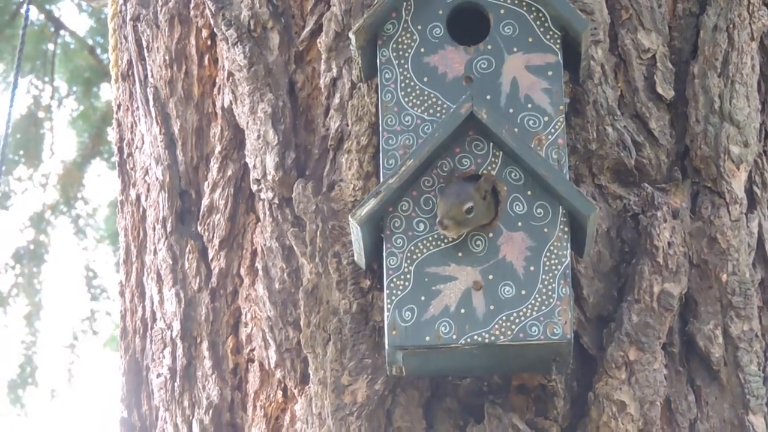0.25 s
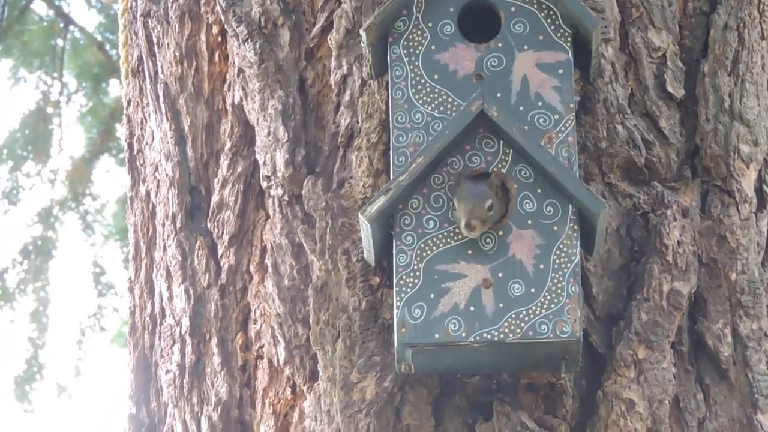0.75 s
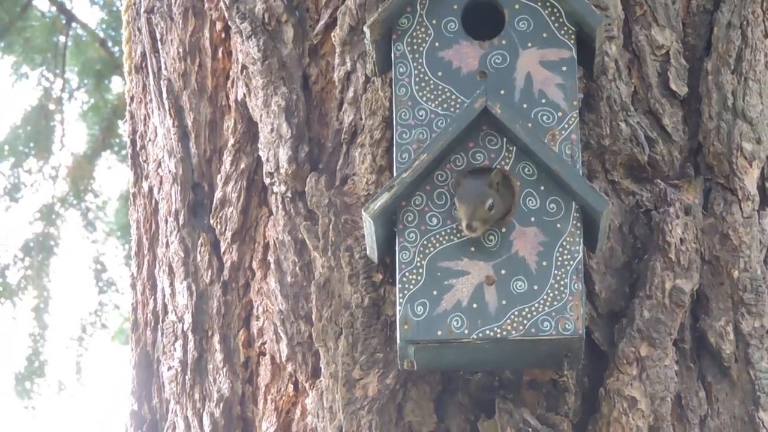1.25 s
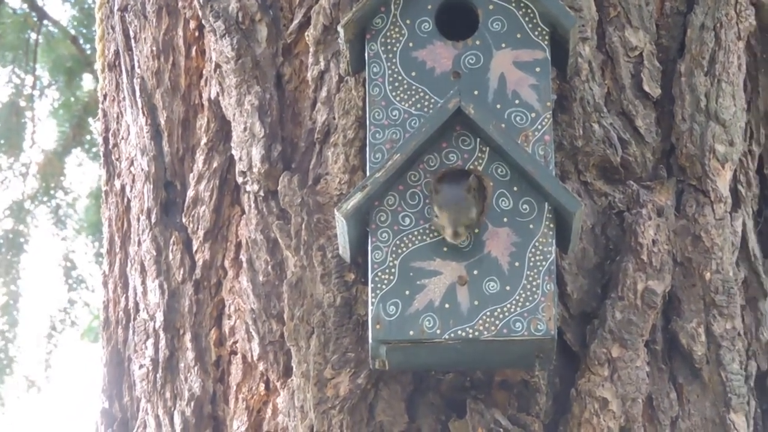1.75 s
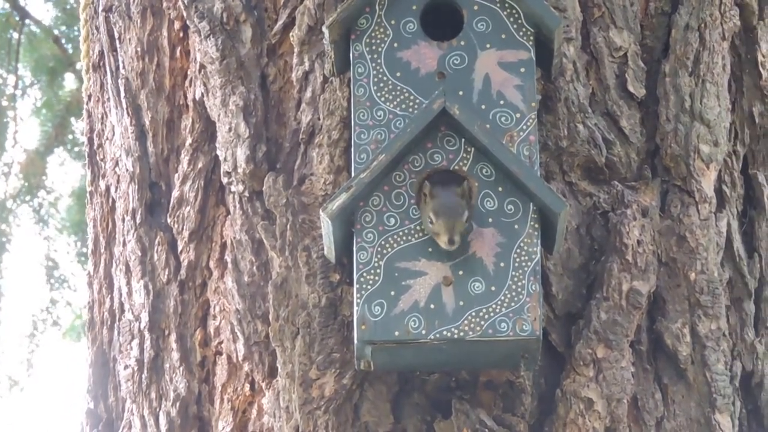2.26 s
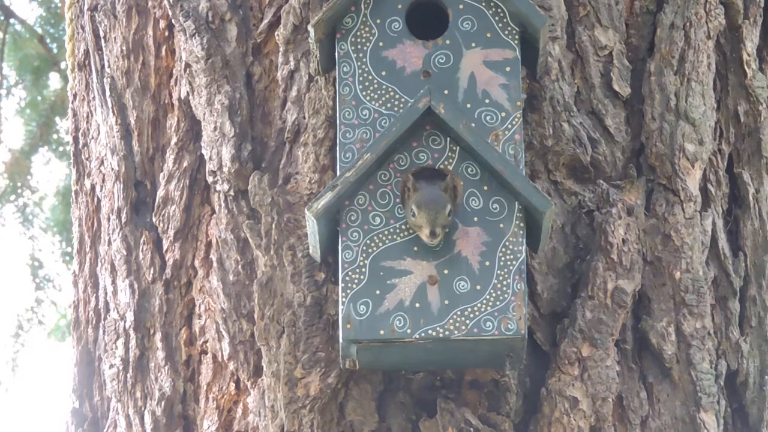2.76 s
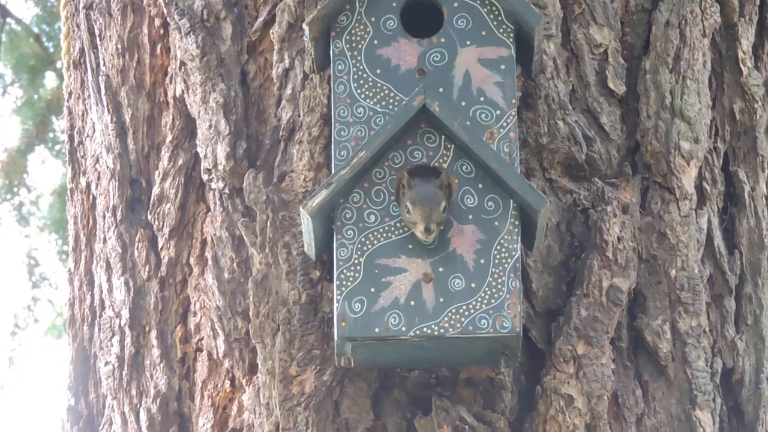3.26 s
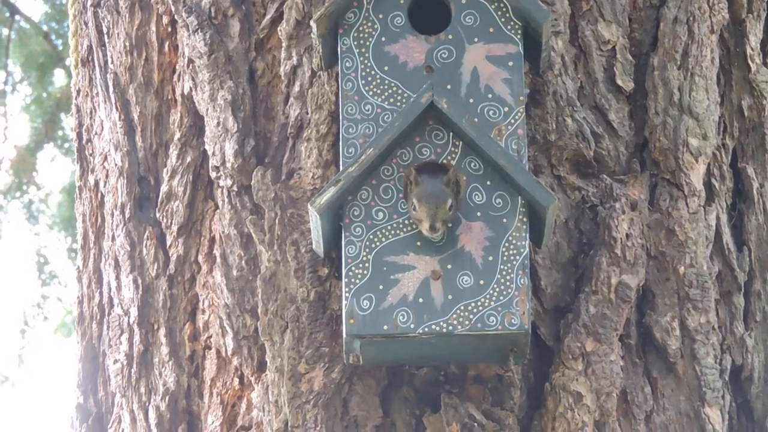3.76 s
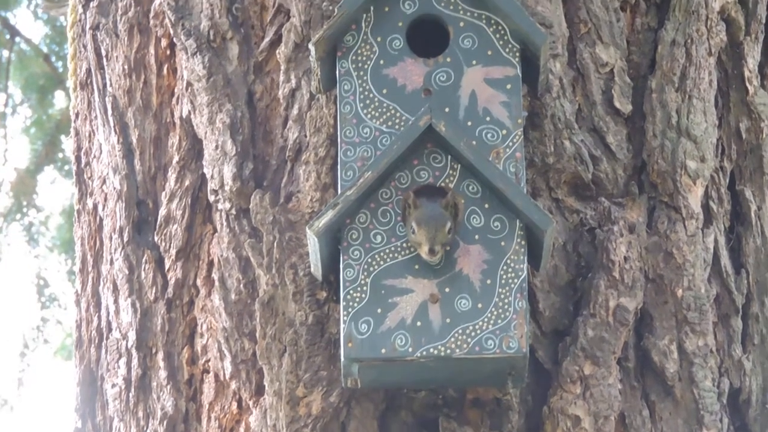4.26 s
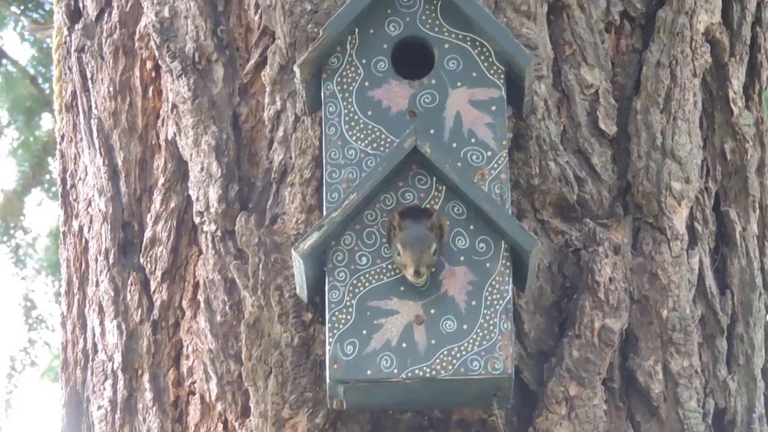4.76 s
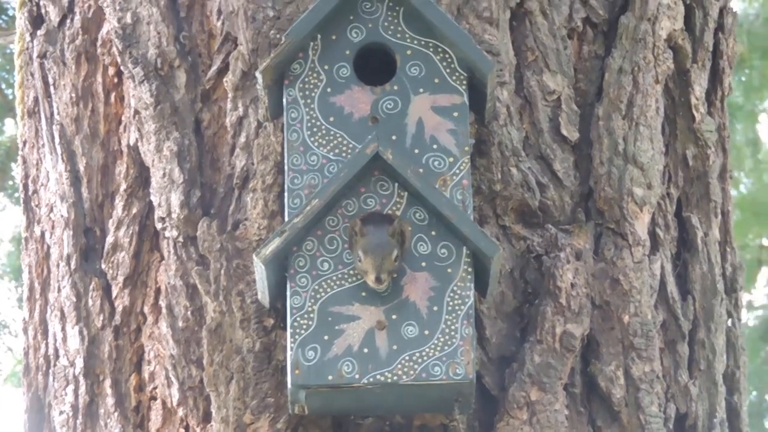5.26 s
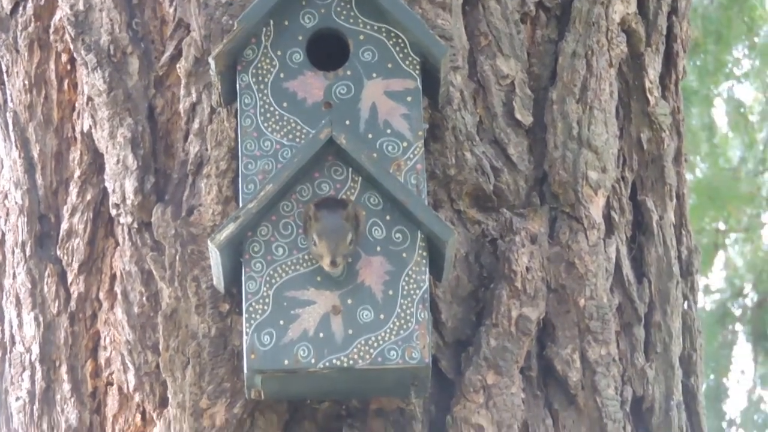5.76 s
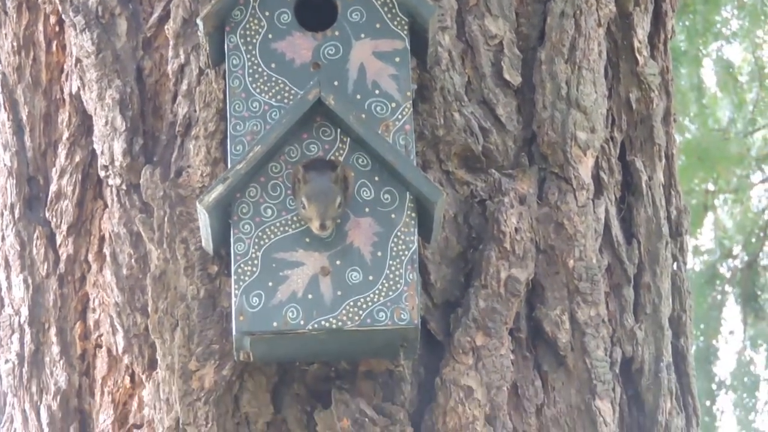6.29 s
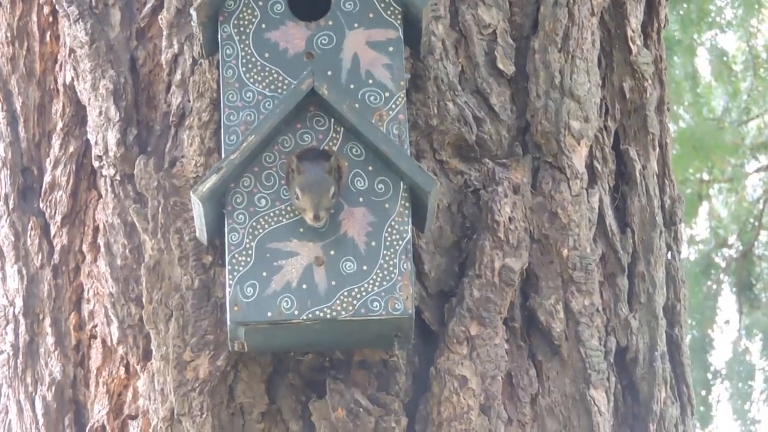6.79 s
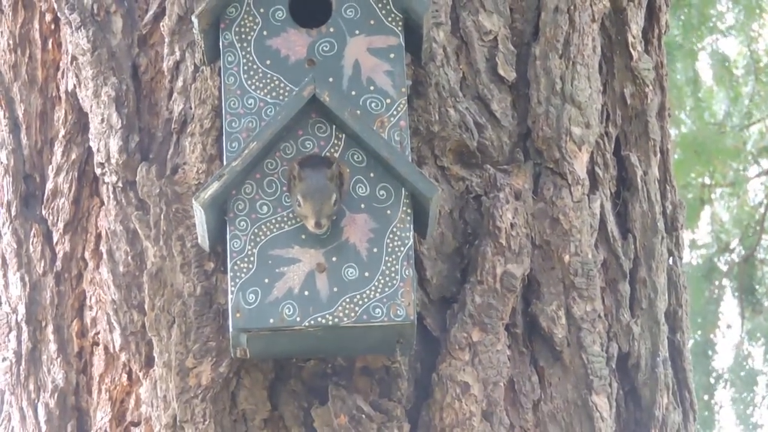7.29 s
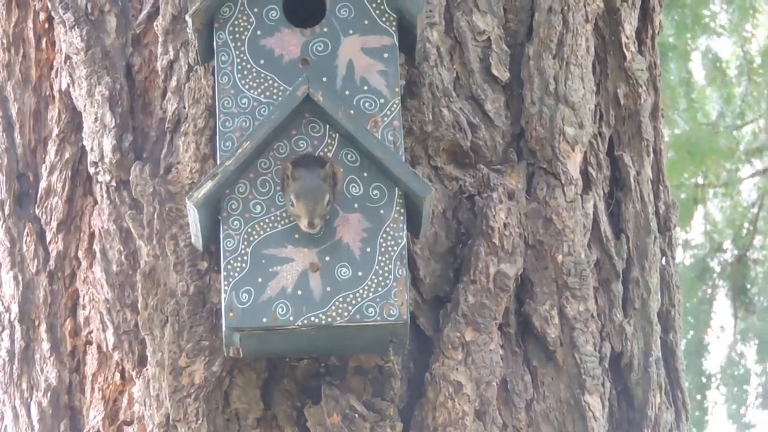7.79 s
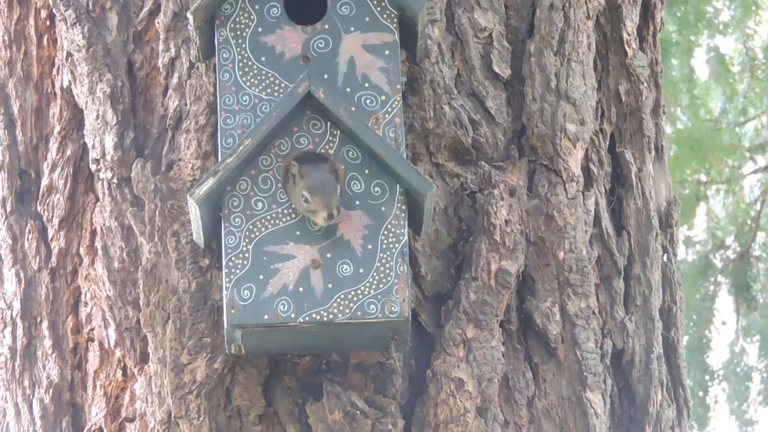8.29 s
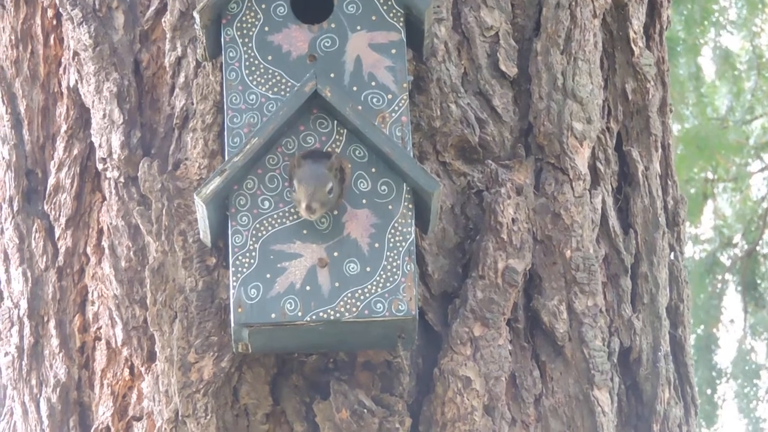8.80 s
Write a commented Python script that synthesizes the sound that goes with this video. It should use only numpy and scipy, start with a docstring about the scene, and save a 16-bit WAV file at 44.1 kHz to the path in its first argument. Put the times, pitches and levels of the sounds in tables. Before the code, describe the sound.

Outdoors among trees, a squirrel scolds in very short, bright, rough pulsed barks, many starting with a thin whistled squeak and a puff of rasping air. Isolated calls lead to an even series of plain chucks, a pause, one strong squeaky call, then spaced, gradually softer ones. Each gets a quick slap echo and brief diffuse tail. Tiny scratches and barely audible peeps lie between, over soft low hum; the stereo microphone hears it a little right.

```python
"""Squirrel scolding from a nest box

A squirrel in the hole of a wooden nest box scolds: rough pulsed chucks, many led in by a thin whistled squeak.
Bursts of rasping air break into the squeaks; faint breathy peeps, a far bird's thin notes and scratchy claw
ticks fill the gaps. Delayed copies and sparse tails of random taps make the trunks and leaves throw every call
back. Far traffic hums below as shaped noise. A stereo camera hears the animal a little to the right."""
import sys
import numpy as np
from scipy import signal
from scipy.fft import rfft, irfft, next_fast_len
from scipy.io import wavfile
from scipy.ndimage import uniform_filter1d

SR = 44100
rng = np.random.default_rng(int(sys.argv[2]) if len(sys.argv) > 2 else 0)


def attenuation_scalar(level_db):
    """Turn a level in dB into a linear amplitude multiplier (20 dB per decade)."""
    decades = np.asarray(level_db, float) / 20
    return 10 ** decades


def wrap_up_sound(samples):
    """Save the sound to the file named by the first command line argument, as 16-bit audio."""
    columns = np.atleast_2d(samples).T
    # keep every value between -1 and 1, then stretch to whole-number steps
    tamed = np.clip(columns, -1, 1)
    steps = np.round(tamed * 32767).astype(np.int16)
    wavfile.write(sys.argv[1], SR, steps)


N = 398663  # length in samples

# The squeaks, one short curve each. Each row: time in seconds, pitch in Hz, level in dB.
SQUEAKS = [
    [(1.103, 4800, -66), (1.115, 6460, -57), (1.122, 6240, -31), (1.13, 6120, -29.5), (1.135, 5500, -47)],
    [(1.187, 5420, -34), (1.192, 6020, -35), (1.199, 5960, -39), (1.203, 5300, -51)],
    [(1.614, 5300, -48), (1.623, 6270, -47), (1.63, 6340, -29.5), (1.64, 6140, -36), (1.645, 6000, -60)],
    [(2.515, 5050, -57), (2.525, 6220, -44), (2.533, 7630, -53), (2.54, 7520, -46), (2.545, 6180, -28),
     (2.55, 6100, -41)],
    [(2.925, 4750, -41), (2.93, 5580, -36), (2.935, 5630, -30), (2.939, 5500, -38), (2.945, 5000, -44)],
    [(4.946, 5240, -63), (4.952, 5800, -39), (4.96, 6120, -26), (4.967, 6270, -23), (4.976, 6150, -32)],
    [(5.697, 5180, -64), (5.71, 6190, -54), (5.724, 6240, -56), (5.729, 6810, -40), (5.733, 6170, -30.5),
     (5.737, 5930, -59)],
    [(6.282, 5430, -67), (6.292, 6480, -37), (6.3, 6400, -57), (6.308, 6870, -49), (6.314, 6850, -48),
     (6.318, 6460, -57)],
    [(6.63, 6060, -55), (6.645, 6100, -51), (6.651, 8080, -55), (6.655, 6300, -33), (6.66, 6220, -59)],
    [(6.995, 6230, -45), (7.003, 6750, -77), (7.028, 6900, -41.5), (7.035, 6080, -31.5), (7.041, 6100, -69)],
    [(7.334, 5590, -64), (7.34, 6350, -60.5), (7.35, 7300, -63), (7.356, 7220, -53), (7.364, 6380, -42),
     (7.368, 5800, -53)],
    [(7.653, 5570, -62), (7.66, 6120, -59), (7.682, 6140, -44.5), (7.695, 6350, -49), (7.703, 6280, -66)],
    [(7.915, 5210, -68), (7.925, 6450, -54), (7.946, 7900, -61), (7.952, 7200, -45), (7.956, 6130, -30.5),
     (7.961, 6000, -62)],
    [(8.623, 4800, -50), (8.627, 5410, -42.5), (8.636, 5280, -50), (8.643, 5050, -38.5), (8.647, 5190, -54)],
]
# How the two ports of the camera hear the animal.
# Each row: frequency in Hz, left minus right in dB, phase lag of the left in radians.
SIDE = [(1100, 1, 0.097), (3000, -6.5, 1.2), (5000, -3, 0.88), (8500, -10.5, 1.57), (12000, -8, 1),
        (15000, -0.5, 1.9)]


def evened(x):
    """Scales to rms 1."""
    return x / np.sqrt(np.mean(x ** 2) + 1e-20)


def read(points, hz, column=1):
    """Reads a table on a log-frequency axis."""
    table = np.transpose(points)
    return np.interp(np.log(hz + 1), np.log(table[0] + 1), table[column])


def add(mix, s, sound):
    """Adds a sound to the mix at s seconds."""
    part = mix[round(s * SR):][:len(sound)]
    part += sound[:len(part)]


def resonate(x, hz, width):
    """Shifts the curve hz to zero, smooths twice and shifts back: a steep resonance of gain 1."""
    turn = np.exp(2j * np.pi * np.cumsum(hz * np.ones(len(x))) / SR)
    r = np.exp(-np.pi * width / SR)
    smooth = signal.lfilter([(1 - r) ** 2], [1, -2 * r, r * r], x / turn)
    return 2 * (turn * smooth).real


def tract(x, modes, mouth=1):
    """Throat and mouth: parallel resonances of alternating sign, all shifted by the mouth, rms 1."""
    total = 0
    for k, (hz, width, db) in enumerate(modes):
        total = total + (-1) ** k * attenuation_scalar(db) * resonate(x, hz * mouth, width)
    return evened(total)


def chuck(s, db, top_hz, length, low_db):
    """Vocal fold pulses speed up as the mouth opens, then sag and turn ragged as the breath runs out."""
    # Throat resonances of the low band. Each row: multiple of the throat pitch, width in Hz, level in dB.
    low_throat = [(.66, 504, -17), (1., 880, 20), (1.5, 1310, -3)]
    # Resonances of the bright band, reached as the mouth opens. Each row: centre in Hz, width in Hz, level in dB.
    bright_throat = [(6900, 2510, -13.5), (10120, 2000, -10.5), (11000, 1000, -2.5), (12620, 1260, 5),
                     (14640, 4900, -13)]
    u = np.arange(round(1.6 * length * SR)) / SR / length  # time in units of length
    wobble, puff = rng.standard_normal((2, len(u)))
    ragged = np.clip(0.18 + 0.4 * u ** 2, 0, 0.8)

    rise = 0.46 * np.clip(1 - u / 1.05, 0, 1) ** 1.8
    sag = 0.35 * np.clip(u - 1.05, 0, 1)
    hz = top_hz * (1 - rise - sag)
    turns = np.cumsum(hz * (1 + 0.5 * ragged * uniform_filter1d(wobble, size=40))) / SR
    folds = evened(sum(np.cos(2 * np.pi * k * turns) * (k * hz < 0.45 * SR) for k in range(1, 28)))
    alternation = 1 + ragged * np.cos(np.pi * turns)  # strong and weak pulses alternate
    folds *= alternation
    puffs = evened(np.exp(-(turns % 1) / 0.3) * puff)  # air noise gated by each opening

    pursed = any(0 < s - rows[-1][0] < 0.02 for rows in SQUEAKS)  # a squeak leaves the mouth narrow
    mouth = 1 - (0.17 if pursed else 0.07) * np.clip(1 - u / 0.89, 0, 1)
    effort = (u + 0.14) * np.exp(-(u / 1.065) ** 3.13)
    effort *= np.clip(u / 0.075, 0.3, 1)  # the first pulses are weak
    late = np.clip((u / 0.44) ** 3, 0.25, 1) if pursed else 1  # the narrow mouth holds the bright band back

    bright = evened(late * effort ** 1.5) * tract((1 - ragged) * folds + ragged * puffs, bright_throat, mouth)
    throat_hz = 3223 + 40 * (low_db + 41)  # a harder chuck stretches the throat to a higher ring
    low_source = folds + 2.2 * (ragged + 0.15) * puffs
    low = evened(effort) * tract(low_source, low_throat, throat_hz * np.sqrt(mouth))
    fundamental = evened(effort ** 0.23 * alternation * np.sin(2 * np.pi * turns))
    fundamental_db = -52.5 + 0.33 * (db + 27)  # grows little with effort
    return s, attenuation_scalar(db) * bright + attenuation_scalar(low_db) * low + attenuation_scalar(fundamental_db) * fundamental


def squeak(rows):
    """A near-sine whistle with its octave and a weak partial at 1.5 times its pitch."""
    s, *columns = np.transpose(rows)
    t = np.arange(s[0], s[-1], 1 / SR)
    hz, db = (np.interp(t, s, c) for c in columns)
    wobble = uniform_filter1d(rng.standard_normal(len(t)), size=40)
    angle = 2 * np.pi * np.cumsum(uniform_filter1d(hz, size=60) * (1 + 0.033 * wobble)) / SR
    octave = attenuation_scalar(-47 + 0.55 * (db + 34))  # grows more slowly than the tone
    octave = octave / (1 + (hz / 6650) ** 30)  # above this pitch it falls out of the bright throat
    octave = octave * (1 + 1.3 * np.exp(-((hz - 5590) / 300) ** 2))  # here it meets a throat resonance
    tone = attenuation_scalar(db) * (np.sin(angle) + attenuation_scalar(-32) * np.sin(1.5 * angle))
    tone = tone + octave * np.sin(2 * angle)
    return s[0], np.sqrt(2) * tone * signal.windows.tukey(len(t), 0.1)


def rasp(s, length, db):
    """Air noise swells in the throat, peaks late and stops."""
    # Throat resonances of the rasping air. Each row: centre in Hz, width in Hz, level in dB.
    airy_throat = [(7000, 3500, -0.91), (9860, 1300, -1.6), (12400, 1500, 0)]
    u = np.arange(round(length * SR)) / SR / length
    air = rng.standard_normal(len(u))
    swell = np.sin(np.pi * u ** 1.64) ** 0.63
    return s, attenuation_scalar(db) * swell * tract(air, airy_throat)


def peep(s, length, hz, width, db):
    """Air noise in a narrow resonance and its octave."""
    air = rng.standard_normal(round(length * SR))
    octave_db = -33 + 260 * length  # drawn-out peeps carry a stronger octave
    sound = evened(resonate(air, hz, width))
    sound = sound + attenuation_scalar(octave_db) * evened(resonate(air, 2 * hz, 2 * width))
    return s, attenuation_scalar(db) * sound * signal.windows.tukey(len(air), 0.4)


def tick(s, db, hz):
    """A short claw scratch: broad noise that falls 60 dB in 14 ms and rings no mode."""
    t = np.arange(300) / SR
    scratch = evened(resonate(rng.standard_normal(300), hz, 5300))
    return s, attenuation_scalar(db - 60 * t / 0.014) * scratch


def direct(x):
    """Direct sound and nearest reflections, then the level and phase difference between the two ports."""
    # Echoes off the near trunks. Each row: delay in seconds, level in dB.
    trunks = [(0.0181, -11), (.036, -22.5)]
    size = next_fast_len(N + SR)
    hz = np.fft.rfftfreq(size, 1 / SR)
    echoes = sum(attenuation_scalar(db) * np.exp(-2j * np.pi * hz * s) for s, db in trunks)
    near = rfft(x, size) * (1 + echoes)
    # each port takes half of the difference
    port = attenuation_scalar(0.5 * read(SIDE, hz)) * np.exp(-0.5j * read(SIDE, hz, column=2))
    return np.array([irfft(near * port, size)[:N], irfft(near / port, size)[:N]])


def woods(x):
    """Three sparse tails of random taps take turns, each band dying at its own speed."""
    # Tail of the woods. Each row: frequency in Hz, time to fall 60 dB in seconds, starting level in dB.
    tail = [(1000, 0.33, -17), (3000, 0.26, -20.5), (7000, 0.25, -13.5), (15100, 0.27, -26.5)]
    at_hz, t60, db = np.transpose(tail)
    out = np.zeros((2, N))
    turn = np.arange(N) / SR * 2.3
    for k in range(3):
        taps = np.zeros((2, SR // 2))
        at = np.arange(450, SR // 2 - 20, 20)  # nothing comes back in the first 10 ms
        at = at + rng.integers(0, 20, (2, len(at)))
        np.put_along_axis(taps, at, rng.choice([-1., 1.], at.shape), 1)
        hz, t, z = signal.stft(taps, SR, nperseg=128)
        z = z * attenuation_scalar(np.interp(hz, at_hz, db)[:, None] - 60 * t / np.interp(hz, at_hz, t60)[:, None])
        z *= attenuation_scalar(np.outer([0.3, -0.3], read(SIDE, hz)))[:, :, None]  # leans less than the direct sound
        response = signal.istft(z, SR, nperseg=128)[1]
        share = np.sqrt(2 / 3) * np.cos(np.pi * (turn + k / 3))  # the three powers add up to one
        out += signal.fftconvolve((x * share)[None], response, axes=1)[:, :N]
    return out


def hum():
    """Far traffic and air: random short-time spectra with patches; rumble and drone swell slowly."""
    # Colour of the hum before its swells. Each row: frequency in Hz, relative level in dB per Hz.
    colour = [(20, -4.5), (40, -10.5), (98, -9), (153, -12), (344, -15.5), (584, -22.5), (863, -19.5),
              (1080, -25.5), (1550, -26), (3900, -30.5), (6400, -34), (12000, -39.5), (15800, -47)]
    # Stereo width. Each row: frequency in Hz, left-right likeness (1 = the same).
    likeness = [(60, 0.9), (380, 0.63), (2380, 0.25), (15000, 0.28)]
    # Stereo balance. Each row: frequency in Hz, left minus right in dB.
    balance = [(100, -3.5), (400, -2), (800, 3), (2400, -0.4), (15000, -.5)]
    # Slow swells. Each row: time in seconds, lift of the deep rumble in dB, lift of the drone near 320 Hz in dB.
    swells = [(0, 2, 7.5), (.6, 3.5, 1), (2.1, 4, 1.5), (2.5, 1.5, 6.5), (3, 1, -0.5), (4, 4.5, 2.5),
              (4.5, -0.5, 1.5), (6.2, 1.5, 1), (9.04, 0, 2)]
    # Blurred engine notes. Each row: frequency in Hz, level over the rumble in dB.
    engines = [(30, 1), (55, 4), (91, 0.5), (170, -9)]
    frames = N // 1024 + 5
    hz = np.fft.rfftfreq(4096, 1 / SR)[:, None]
    a, b, c, d, patches = rng.standard_normal((frames, 2049, 5)).T
    patches = uniform_filter1d(patches, size=16, axis=0)  # across frequency
    patches = evened(uniform_filter1d(patches, size=10, axis=1))  # across time

    s, *levels = np.transpose(swells)
    rumble_db, drone_db = (np.interp(np.arange(frames) * 1024 / SR, s, db) for db in levels)
    swell_db = rumble_db / (1 + (hz / 90) ** 4) + drone_db * np.exp(-((hz - 320) / 60) ** 2)

    alike = np.clip(read(likeness, hz), -1, 1)
    left = a + 1j * b
    right = alike * left + np.sqrt(1 - alike ** 2) * (c + 1j * d)
    z = np.array([left, right])
    z *= attenuation_scalar(read(colour, hz) + 0.82 * patches + swell_db)
    z *= 1 + sum(attenuation_scalar(db) / (1 + ((hz - f) / 7) ** 4) for f, db in engines)
    z *= attenuation_scalar(np.array([0.5, -0.5])[:, None, None] * read(balance, hz))
    noise = signal.istft(z, nperseg=4096, noverlap=3072)[1][:, :N]
    return attenuation_scalar(-48) * evened(noise)


def scene():
    """The animal, its echoes and the background."""
    # Each row: start in seconds, level of the bright band in dB, top pitch in Hz,
    # time scale in seconds (a chuck lasts 1.6 of these), level of the low band in dB.
    chucks = [(1.142, -28, 1273, 0.022, -41.5), (1.206, -30, 983, .02, -46),
              (1.65, -32, 1178, 0.023, -45.5), (2.554, -26, 1243, 0.024, -39.5),
              (2.891, -34, 915, 0.019, -39), (3.118, -28.5, 1127, 0.027, -39.5),
              (3.304, -30, 1163, .025, -41), (3.514, -30, 1147, .026, -41.5),
              (3.743, -29, 1150, 0.027, -40.5), (3.97, -30, 1157, 0.027, -40.5),
              (4.162, -31, 1100, 0.024, -42), (4.978, -27.5, 1343, 0.025, -37),
              (5.351, -36, 1018, 0.019, -40), (5.738, -31.5, 1228, 0.032, -44),
              (6.318, -34, 1137, .03, -43), (6.664, -38, 1129, 0.032, -44.5),
              (7.046, -36.5, 1018, .025, -47.5), (7.374, -36.5, 1092, .027, -49.5),
              (7.964, -31.5, 1148, 0.026, -46.5), (8.325, -41, 963, 0.023, -49),
              (8.59, -63, 1082, .018, -48.5)]
    # Rasping air where a squeak breaks up. Each row: start in seconds, length in seconds, level in dB.
    rasps = [(1.122, 0.012, -44), (1.626, .018, -58), (2.524, .024, -41.5), (2.925, .018, -46),
             (4.955, .02, -44), (5.704, 0.033, -41.5), (6.284, 0.026, -40.5), (6.64, 0.024, -48),
             (7.014, .026, -52), (7.345, 0.02, -50), (7.933, 0.031, -44.5)]
    # Faint peeps. Each row: start and length in seconds, pitch in Hz, width in Hz, level in dB. The first three
    # rows and the 2300 Hz notes near 1.8 s are a distant bird; the rest are the animal's breathy peeps.
    peeps = [(0.014, .031, 7000, 500, -64.5), (.078, .031, 6670, 300, -64), (.255, .054, 8200, 400, -69),
             (1.793, 0.0092, 2300, 60, -51), (1.882, 0.01, 2340, 60, -52.5), (4.597, .13, 6900, 900, -69.5),
             (4.775, .059, 7140, 150, -68), (4.82, .11, 6400, 400, -66), (5.928, .12, 6300, 300, -71),
             (6.099, 0.12, 6460, 1800, -65), (7.615, .047, 6100, 3000, -57.5), (8.25, .03, 5370, 151, -65),
             (8.598, 0.014, 5600, 200, -54), (9.02, .03, 6240, 500, -63)]
    # Claws on wood. Each row: start in seconds, starting level in dB, centre in Hz.
    ticks = [(0.4713, -50.5, 11000), (2.4257, -55, 7010), (4.492, -55, 12000), (4.5147, -47.5, 11000),
             (4.5217, -50, 11200), (4.7601, -48.5, 10700), (5.9588, -51, 6530), (7.353, -33.5, 6310),
             (7.8394, -57, 6080)]
    calls = np.zeros(N)
    for row in chucks:
        add(calls, *chuck(*row))
    for rows in SQUEAKS:
        add(calls, *squeak(rows))
    for row in rasps:
        add(calls, *rasp(*row))
    for row in peeps:
        add(calls, *peep(*row))
    for row in ticks:
        add(calls, *tick(*row))
    return direct(calls) + woods(calls) + hum()


def low_pass(x):
    """A steep low-pass: nothing above about 16.3 kHz remains."""
    return signal.sosfilt(signal.butter(12, 16340, fs=SR, output="sos"), x)


def record(dry):
    """The camera's band limit: a steep low-pass at 16 kHz."""
    edge = signal.firwin(255, 16000, window=("kaiser", 9), fs=SR)
    mix = signal.oaconvolve(dry, edge[None], "same")
    return low_pass(mix)


dry = scene()
out = record(dry)
wrap_up_sound(out)
```